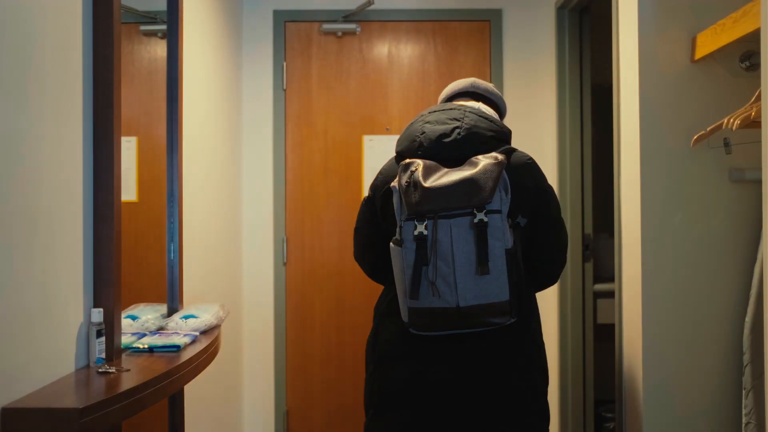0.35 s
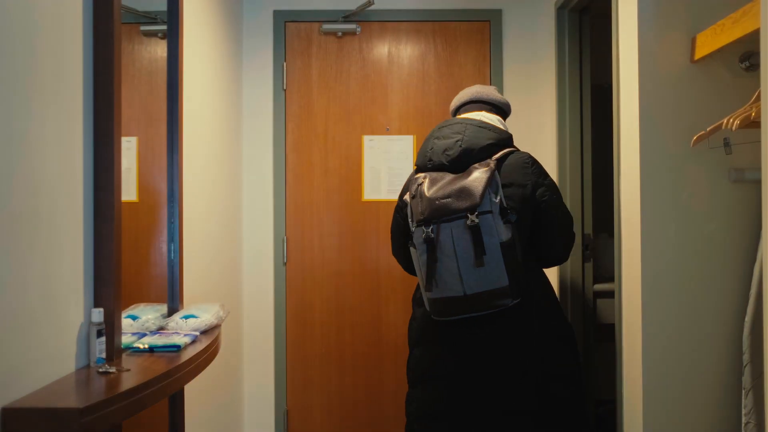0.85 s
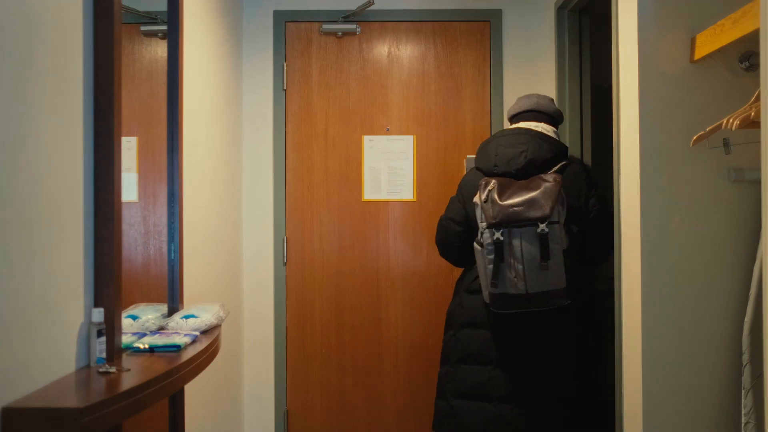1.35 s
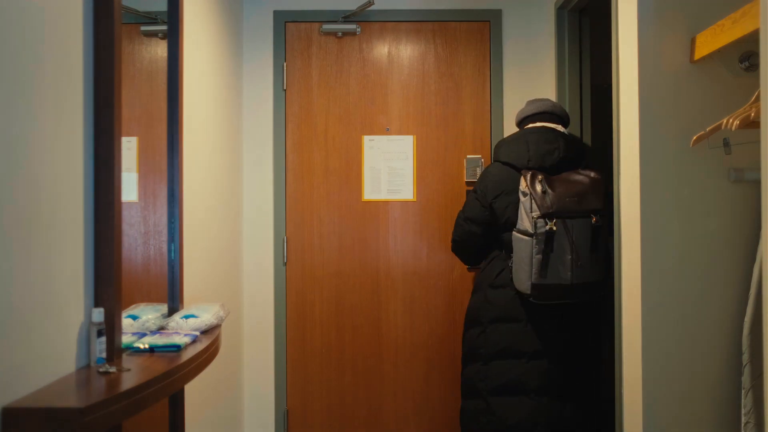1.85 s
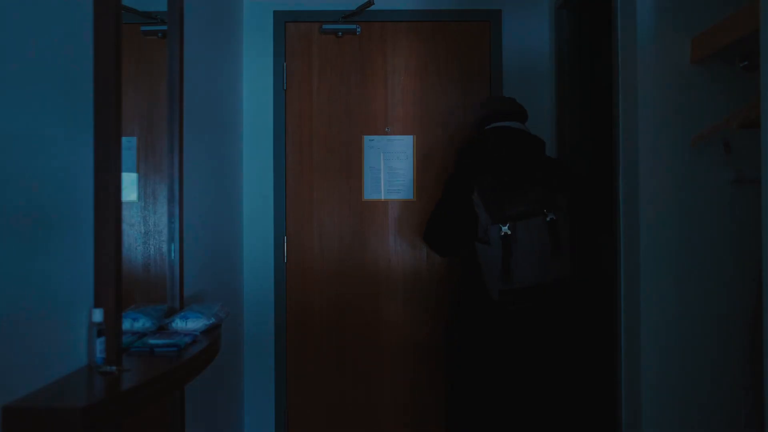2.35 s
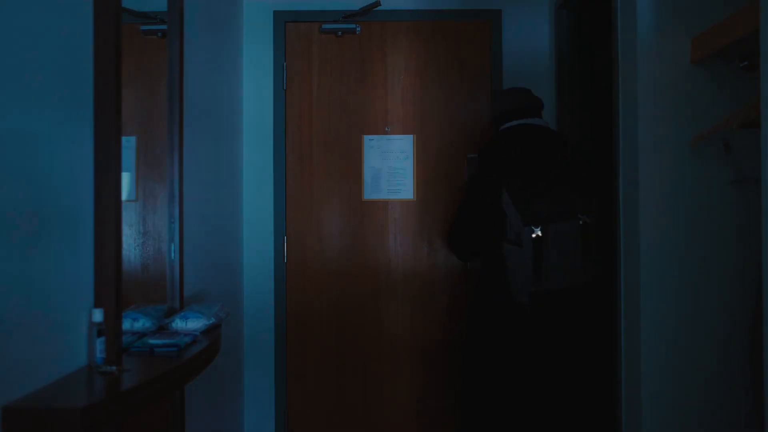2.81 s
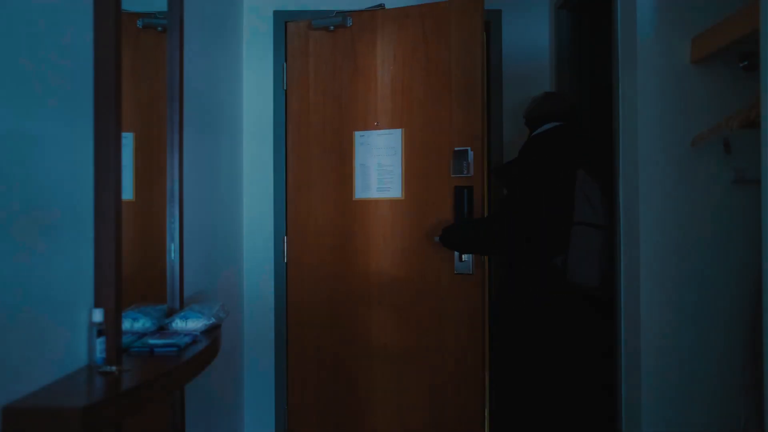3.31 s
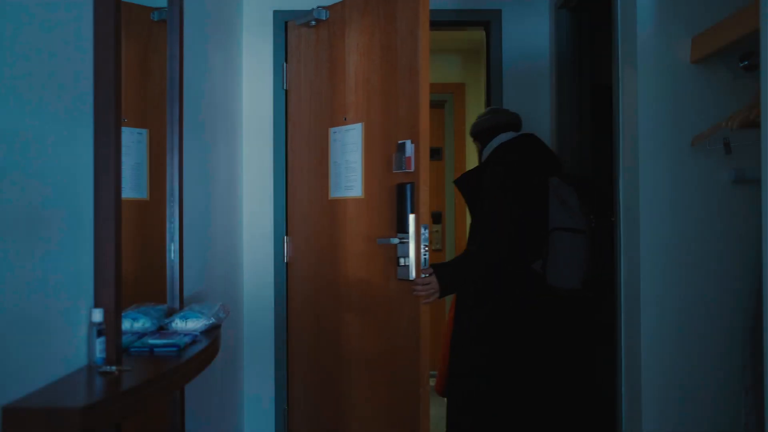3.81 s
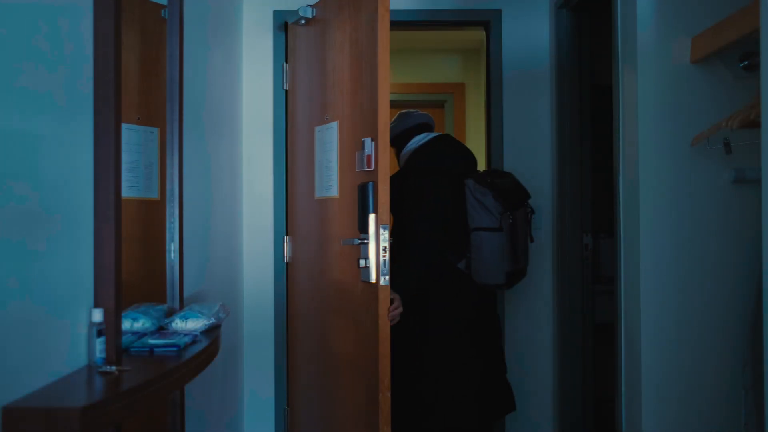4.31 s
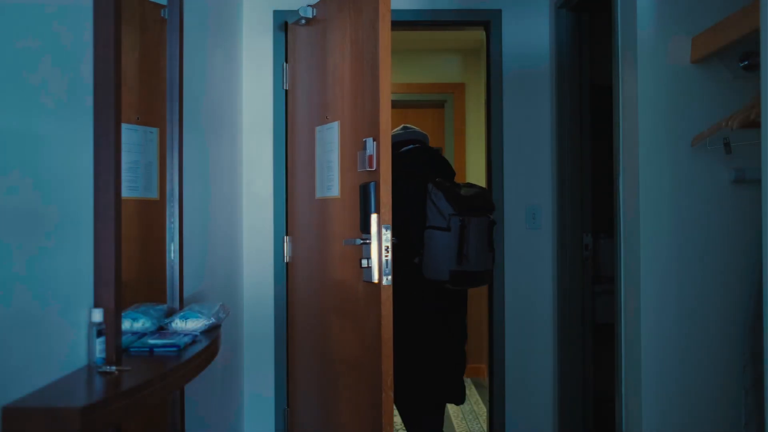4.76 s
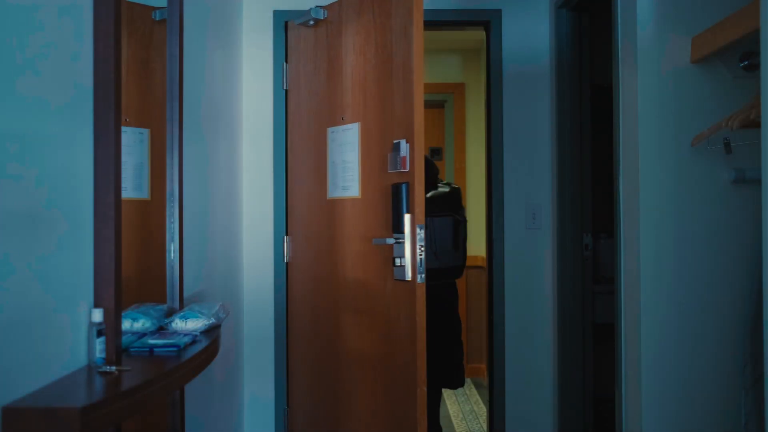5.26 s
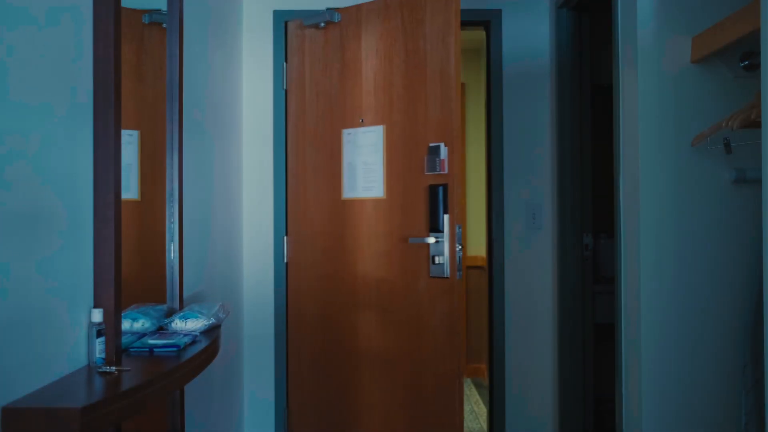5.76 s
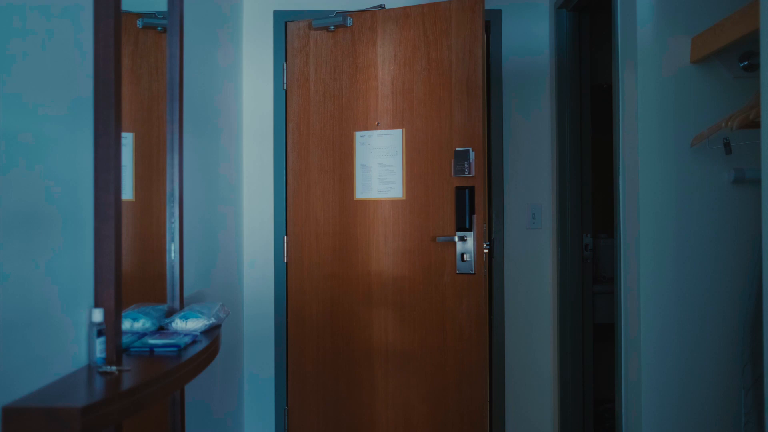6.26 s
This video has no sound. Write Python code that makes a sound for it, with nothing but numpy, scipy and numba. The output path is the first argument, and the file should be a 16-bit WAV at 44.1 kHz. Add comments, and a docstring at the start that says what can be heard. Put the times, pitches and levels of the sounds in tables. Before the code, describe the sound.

Someone in a bulky coat walks a few steps on a hollow-sounding floor, fabric swishing close to the microphone. Cloth drags sharply and a strap squeaks, the door handle snaps, and soft rustling continues with an isolated tap. Then the latch clatters in quick metallic ticks, followed by a strong dull knock and a last small click. Indoor, dry, very little echo, knocks and metal mostly on the right.

```python
"""Small dry hallway: someone in a padded coat and backpack walks and works a door handle.
Nylon rubs and scuffs close by: banded fibre noise under swelling and dying envelopes.
Heels and toes tap to the right: damped knocks with a ringing board. Handle and latch click: noise and modes.
Weight settles in soft low thuds, and strap or fabric squeaks: both are narrow bands of noise."""
import sys
import numpy as np
from scipy import signal
from scipy.fft import rfft, irfft, next_fast_len
from scipy.io import wavfile
from scipy.ndimage import uniform_filter1d
from numba import njit

SR = 44100
rng = np.random.default_rng(int(sys.argv[2]) if len(sys.argv) > 2 else 0)


def store_pcm(level_fs):
    """Save levels as 16-bit WAV."""
    pcm = np.round(np.clip(level_fs, -1, 1) * 32767).astype(np.int16)
    wavfile.write(sys.argv[1], SR, np.atleast_2d(pcm).T)


def voltage_ratio(level):
    """Linear amplitude factor for a level in decibels (scalar or array-like)."""
    return 10 ** (np.asarray(level, float) / 20)


N = 281358
T = np.arange(N) / SR


def on_hz(table, size):
    """A (Hz, value) table read at every FFT bin on a log axis."""
    hz, value = np.transpose(table)
    return np.interp(np.log(np.fft.rfftfreq(size, 1 / SR) + 1), np.log(hz), value)


def band(x, lo_hz, hi_hz):
    """Steep band-pass, rms 1."""
    sos = signal.butter(3, [lo_hz, min(hi_hz, 0.45 * SR)], "band", fs=SR, output="sos")
    y = signal.sosfilt(sos, x)
    return y / np.sqrt(np.mean(y ** 2))


def walk(rate_hz):
    """Random levels, rate_hz per second, joined by straight slopes."""
    hold = int(SR / rate_hz)
    steps = np.repeat(rng.standard_normal(N // hold + 1), hold)
    return 0.87 * uniform_filter1d(steps, hold)[:N]


def add(out, start_s, sound):
    """Mix a stereo sound in at start_s."""
    i = int(start_s * SR)
    out[:, i:i + sound.shape[1]] += sound[:, :N - i]


# Colour of sound past the clothing. Each row: frequency in Hz, gain in dB.
CLOTH_GAIN = [(30, -40), (60, -2.5), (180, 7.5), (285, -2.5), (465, 6.5), (620, -4), (1000, 1), (2150, -4),
              (2700, -23), (3150, -14), (5200, -16.5), (6250, -33), (7000, -24), (10000, -25),
              (14100, -37.5), (15500, -45)]
# Left-right likeness of the fibre noise. Each row: frequency in Hz, likeness 0-1.
EAR_LIKENESS = [(130, 1), (1400, 0.65), (3100, 0.69), (6800, 0.15), (15000, 0)]


def fibres(grit_db):
    """Threads slip over threads: noise with uneven grains, alike left and right in the bass only."""
    size = next_fast_len(N)
    grains = rng.standard_normal((2, N)) * voltage_ratio(grit_db * walk(640))
    mid, side = rfft(grains, size)
    like = np.sqrt(np.clip(on_hz(EAR_LIKENESS, size), 0, 1))
    mid, side = mid * np.sqrt(1 + like), side * np.sqrt(1 - like)
    stereo = np.array([mid + side, mid - side])
    return irfft(voltage_ratio(on_hz(CLOTH_GAIN, size)) * stereo, size)[:, :N]


def patchy(x, patchy_db):
    """Small folds ring and fall silent at random: short, narrow patches of the sound swell or dip."""
    frames = signal.stft(x, nperseg=384)[2]
    chance = uniform_filter1d(rng.standard_normal(frames.shape[1:]), size=4) * 2  # same in both ears
    return signal.istft(frames * voltage_ratio(patchy_db * chance), nperseg=384)[1][:, :N]


@njit
def resonance(x, centre_hz, width_hz):
    """State-variable band-pass whose centre moves sample by sample, gain 1 at the centre."""
    y, band_state, low_state = np.empty(len(x)), 0., 0.
    for i in range(len(x)):
        g, k = np.tan(np.pi * centre_hz[i] / SR), width_hz / centre_hz[i]
        v = (band_state + g * (x[i] - low_state)) / (1 + g * (g + k))
        band_state = 2 * v - band_state
        low_state = low_state + 2 * g * v
        y[i] = k * v
    return y


# Quiet nylon rubbing between movements. Each row: time in seconds, level in dB.
RUBBING = [(0.0, -65.5), (2.54, -55.5), (2.66, -62), (4.01, -59), (4.23, -60), (4.9, -58), (5.78, -69),
           (6.06, -67.5), (6.38, -62.5)]
RUB_BODY_DB, RUB_HISS_DB, RUB_AIR_DB = -3.5, -4.5, -14  # re rubbing level
# Limb swings: cloth swells, stops short.
# Each row: stop in seconds, swell in seconds, level in dB, brightness in dB, fold resonance in Hz.
LIMB_SWINGS = [(0.029, 0.33, -58, -3.5, 1370), (0.401, 0.44, -47.5, -2.5, 1800),
               (0.611, 0.12, -53.5, -11.5, 1190), (1.026, 0.43, -54, -1, 1486),
               (1.25, 0.18, -50.5, -8, 1210), (1.762, 0.19, -57, 5, 1760), (1.995, 0.28, -58.5, 0, 1600),
               (2.41, 0.42, -70, 7, 1240), (2.444, 0.051, -36.5, -13, 1620),
               (3.445, 0.094, -60, 10.5, 1480), (3.69, 0.54, -64.5, 0, 1396), (4.2, 0.2, -60.5, -13, 1010),
               (4.3, 0.21, -62, 5.5, 1500), (4.618, 0.36, -50, 0.5, 1520), (4.81, 0.19, -60.5, -6, 1420),
               (5.03, 0.11, -55.5, -2, 1455), (5.195, 0.072, -63.5, 3.5, 1886), (5.4, 0.13, -63, -6, 1800),
               (6.201, 0.28, -61.5, 0.5, 1520)]
SWING_T60_S, SWING_BODY_DB, SWELL_POWER = 0.18, -10, 5.83
# Sudden drags of cloth.
# Each row: start in seconds, level in dB, 60 dB fall in seconds, brightness in dB, body in dB.
CLOTH_DRAGS = [(0.992, -46, 0.14, -28, 3.5), (1.249, -39, 0.37, -10.5, -3), (1.276, -38, 0.071, -6.5, -0.5),
               (1.964, -44.5, 0.22, -13.5, -4.5), (2.045, -40, 0.061, -19, -49),
               (2.103, -49.5, 0.026, -12, -34), (2.436, -29.5, 0.2, -7, -11.5),
               (2.4774, -31.5, 0.11, -3.5, -12), (2.494, -29.5, 0.22, -15, -6.5),
               (2.881, -53.5, 0.19, -8.5, -7.5), (2.996, -45.5, 0.32, -3, -21),
               (3.05, -32.5, 0.036, 2, -40), (3.063, -30, 0.15, -3.5, -40), (3.375, -57.5, 0.34, -6, -7.5),
               (5.571, -45.5, 0.092, -10.5, -11), (6.273, -53, 0.06, -5, -30)]
DRAG_RISE_S, DRAG_HOLD, DRAG_GRIT_DB = 0.0048, 0.2, 1  # hold: share of the fall time
SWING_AIR_DB, DRAG_AIR_DB = (-9, -29), (-12, -24)  # air and top layers
HISS_POWER, AIR_POWER = 1.07, 1.26  # envelope powers: treble rises later, dies sooner


def swing_shape(stop_s, swell_s):
    """Envelope of a limb swing: slow swell, then exponential fall from the stop."""
    swell = np.sin(np.pi / 2 * np.clip(1 + (T - stop_s) / swell_s, 0, 1)) ** SWELL_POWER
    return voltage_ratio(-60 * np.clip(T - stop_s, 0, 1) / SWING_T60_S) * swell


def drag_shape(start_s, fall_s):
    """Envelope of a drag: quick rise, short hold, exponential fall."""
    rise = np.clip((T - start_s) / DRAG_RISE_S, 0, 1) ** 2
    return voltage_ratio(-60 * np.clip((T - start_s - DRAG_RISE_S) / fall_s - DRAG_HOLD, 0, 9)) * rise


def coat():
    """Rubbing, swings and drags each set body, middle, hiss, air and top of one fibre noise; rubbing has no top."""
    middle = voltage_ratio(np.interp(T, *np.transpose(RUBBING)))
    body, hiss, air = middle * voltage_ratio(RUB_BODY_DB), middle * voltage_ratio(RUB_HISS_DB), middle * voltage_ratio(RUB_AIR_DB)
    top = 0
    grit = voltage_ratio(DRAG_GRIT_DB * walk(250))  # a hard drag catches unevenly
    moves = [(db, swing_shape(stop, swell), bright_db, SWING_BODY_DB, SWING_AIR_DB)
             for stop, swell, db, bright_db, _ in LIMB_SWINGS]
    moves += [(db, grit * drag_shape(start, fall), bright_db, body_db, DRAG_AIR_DB)
              for start, db, fall, bright_db, body_db in CLOTH_DRAGS]
    for db, shape, bright_db, body_db, (air_db, top_db) in moves:
        body = body + shape * voltage_ratio(db + body_db)
        middle = middle + shape * voltage_ratio(db)
        hiss = hiss + shape ** HISS_POWER * voltage_ratio(db + bright_db)
        # brightness weighs most at the very top
        air = air + shape ** AIR_POWER * voltage_ratio(db + 1.34 * bright_db + air_db)
        top = top + shape ** AIR_POWER * voltage_ratio(db + 2.3 * bright_db + top_db)
    noise = patchy(fibres(grit_db=0.56), patchy_db=3.5)
    # air pocket in the folds lifts one pitch, wandering from swing to swing
    fold_hz = np.interp(T, *np.transpose([(row[0], row[-1]) for row in LIMB_SWINGS]))
    noise = noise + 0.37 * np.array([resonance(ear, fold_hz, 490.0) for ear in noise])
    layers = [(body, 25, 640), (middle, 640, 2700), (hiss, 2700, 6300),
              (air, 6300, 17000), (top, 10500, 17000)]
    rustle = sum(gain * voltage_ratio(0.87 * walk(40)) * band(noise, lo_hz, hi_hz) for gain, lo_hz, hi_hz in layers)
    return rustle * voltage_ratio([[-0.8], [0.8]])


# Heel and toe taps. Each row: start in seconds, knock in dB, board ring in dB, ring decay in seconds.
FOOT_TAPS = [(.028, -13, -21, 0.0066), (0.068, -24.5, -35.5, 0.017), (0.409, -23, -32, 0.0092),
             (0.43, -44, -31.5, 0.0083), (0.445, -21.5, -38, 0.019), (.6127, -28, -30.5, 0.0042),
             (0.653, -27, -39, 0.022), (1.035, -14.5, -23, 0.0045), (1.07, -28, -35.5, 0.0077),
             (1.09, -35, -40, 0.0083), (1.411, -18, -31, 0.011), (1.443, -24.5, -33.5, 0.017),
             (3.635, -58, -37, 0.022), (3.664, -30, -43.5, 0.071), (3.698, -14.5, -25, 0.01),
             (4.6235, -17, -19.5, 0.0052), (5.453, -13, -26.5, 0.043), (5.611, -20.5, -31, 0.023),
             (5.8258, -9, -19, 0.0068), (5.845, -42, -40, 0.038), (5.908, -39, -40.5, 0.0096)]
KNOCK_HZ, BOARD_HZ = 394, 176.8


def taps():
    """A short hollow knock, mostly on the right, then the board rings on with a rattle at its octave."""
    out, t = np.zeros((2, N)), np.arange(int(0.15 * SR)) / SR
    swell = t / 0.0016 * np.exp(1 - t / 0.0013)
    ring_rise = np.sin(np.pi / 2 * np.clip(t / 0.0037, 0, 1)) ** 2
    for start, knock_db, ring_db, decay_s in FOOT_TAPS:
        # uneven rattle: phase drifts, each swing has its own size
        wobble = uniform_filter1d(np.cumsum(rng.standard_normal(len(t))), size=90) * 0.055
        loose = voltage_ratio(0.63 * np.interp(t, np.arange(30) * 0.0075, rng.standard_normal(30)))
        turn = 2 * np.pi * BOARD_HZ * (t - 0.002) + wobble
        ring = loose * voltage_ratio(ring_db) * np.exp(-(t / decay_s) ** 1.6) * ring_rise
        knock_hz = KNOCK_HZ * (1 + 0.012 * rng.standard_normal())
        hit = -voltage_ratio(knock_db) * swell * np.sin(2 * np.pi * knock_hz * t)
        left = 0.044 * hit + ring * (np.cos(turn) + 0.29 * np.cos(2 * turn))
        right = hit + ring * (1.09 * np.cos(turn) + 1.26 * np.cos(2 * turn))
        add(out, start, np.array([left, right]))
    # the taps carry no deep bass, below 50 Hz
    return signal.sosfilt(signal.butter(2, 50, "high", fs=SR, output="sos"), out)


# Handle, latch and buckle clicks.
# Each row: start in seconds, level in dB, main ring in Hz, crack in dB, build-up in seconds.
METAL_CLICKS = [(0.0256, -43, 1380, -3, .0004), (1.9965, -27, 1800, -6, .002),
                (2.003, -33, 4300, -6, .0015), (2.0495, -31.5, 2330, -21, .0015),
                (2.997, -32, 4000, -20, .0015), (3.4508, -21.5, 4130, -1.5, .0012),
                (5.0368, -23.5, 1720, -6, 0.0015), (5.0492, -33, 4550, -20, .0015),
                (5.056, -35.5, 1250, -8, .0015), (5.1979, -21, 2430, -5.5, 0.001),
                (5.2047, -39, 1210, -19, .001), (5.408, -22, 4260, -3.5, .0004),
                (5.4147, -30, 3420, -5, .0035), (5.432, -29.5, 1850, -8, .002),
                (5.4418, -27, 3530, -5, .003), (5.45, -23.5, 4450, -4.5, .0012),
                (5.551, -46, 3640, -4, .001), (5.5595, -38, 1230, -14, .002),
                (5.581, -29, 4510, -5.5, .0025), (5.588, -35, 4340, -12, .002),
                (5.6018, -14.5, 4486, -5, .003), (6.251, -28.5, 1710, -24, .002),
                (6.2575, -27, 1980, -4, .0028), (6.28, -33, 2000, -10, .0004)]
# Latch modes. Each row: frequency in Hz, level in dB, longest T60 in seconds.
LATCH_MODES = [(1176, -8, 0.14), (1800, 1.5, 0.077), (2412, 1.5, 0.046), (3388, -2, 0.035),
               (4095, -3, 0.036), (4670, 9.5, 0.0059), (5260, -4.5, 0.038), (7500, -24, 5.0)]
BASE_T60_S, BASE_LEVEL_DB, SHORTENING_PER_DB = 0.012, -18.5, 0.023  # harder clicks die faster
FADE_POWER, NEAR_DB_PER_OCTAVE = 0.92, 8
RIGHT_LATE_S = 0.000269  # sharp edge reaches the right later


def clicks():
    """Metal meets metal, louder on the right: noise crack, struck part and the latch modes nearest to it."""
    out, t = np.zeros((2, N)), np.arange(4096) / SR
    mode_hz, mode_db, mode_t60 = np.transpose(LATCH_MODES)[:, :, None]
    for start, level_db, ring_hz, crack_db, rise_s in METAL_CLICKS:
        # the parts scrape, then meet
        after = np.clip(t - rise_s, 0, 1)
        grow = np.clip(t / max(rise_s, 1 / SR), 0, 1) ** 2.9
        base_s = BASE_T60_S * np.exp(-SHORTENING_PER_DB * (level_db - BASE_LEVEL_DB))

        near = voltage_ratio(mode_db - NEAR_DB_PER_OCTAVE * np.abs(np.log2(mode_hz / ring_hz)))
        phase = rng.uniform(0, 2 * np.pi, mode_hz.shape)
        mode_fade = voltage_ratio(-60 * (after / np.minimum(mode_t60, 1.4 * base_s)) ** FADE_POWER)
        modes = np.sum(near * mode_fade * np.sin(2 * np.pi * mode_hz * t + phase), axis=0)
        part_fade = voltage_ratio(-60 * (after / (1.16 * base_s)) ** FADE_POWER)
        part = part_fade * np.sin(2 * np.pi * ring_hz * t)

        hiss = irfft(rfft(rng.standard_normal((2, len(t)))) * voltage_ratio(on_hz(CLOTH_GAIN, len(t))), len(t))
        crack_fade = voltage_ratio(-60 * (after / (1.3 * base_s)) ** FADE_POWER)
        wall_tail = voltage_ratio(-19.0 - 60 * t / 0.071)  # nearby walls
        crack = band(hiss[0] + 0.27 * hiss, 1690, 6660) * (crack_fade + wall_tail)
        # only a hard crack reaches the very top
        tick = band(band(hiss, 4400, 11000), 4400, 11000) * voltage_ratio(-60 * after / 0.0065)

        click = 1.53 * modes / np.abs(modes).max() + voltage_ratio(crack_db) * crack + voltage_ratio(4.96 * crack_db + 5) * tick
        click = click * grow
        click[1] = np.interp(t - RIGHT_LATE_S, t, click[1], left=0)
        click = click + 0.41 * part * grow  # main ring fills the hallway: no delay between ears
        add(out, start, click * voltage_ratio(level_db + np.array([[-2], [3.5]])))
    return out


# Soft thuds of body weight. Each row: start in seconds, level in dB, pitch in Hz, decay in seconds.
WEIGHT_THUDS = [(1.257, -29, 187, 0.025), (1.31, -36.5, 196, 0.02), (1.474, -40, 139, 0.039),
                (1.731, -47.5, 119, 0.069), (2.007, -42, 202, 0.043), (2.172, -45.5, 149, 0.077),
                (2.487, -33, 197, 0.049), (3.385, -54.5, 162, 0.061), (4.15, -53, 193, 0.039),
                (4.795, -51, 131, 0.041), (4.912, -54, 180, 0.085)]


def thuds():
    """Weight rolls onto the floor: a short rumble around one low pitch, the same in both ears."""
    out, t = np.zeros((2, N)), np.arange(int(0.3 * SR)) / SR
    for start, db, hz, decay_s in WEIGHT_THUDS:
        rumble = band(rng.standard_normal(2 * len(t)), 0.746 * hz, 1.335 * hz)[len(t):]
        shape = np.exp(-(t / decay_s) ** 2) * np.clip(t / 0.0025, 0, 1)
        add(out, start, np.tile(voltage_ratio(db) * rumble * shape, (2, 1)))
    return out


# Squeaks of strap or fabric. Each row: start in seconds, level in dB, pitch in Hz, decay in seconds.
STRAP_SQUEAKS = [(0.968, -47, 1570, 0.04), (1.958, -41, 497, 0.036), (2.05, -39, 976, 0.045),
                 (2.064, -44.5, 2300, 0.032), (1.279, -45.5, 4680, 0.073), (2.482, -30, 5270, 0.014),
                 (2.497, -17, 1670, 0.011), (2.895, -38.5, 2100, 0.012), (2.096, -45.5, 3280, 0.019),
                 (2.104, -50, 1530, 0.045), (4.151, -49, 954, 0.024), (4.339, -48.5, 1770, 0.051),
                 (4.534, -47, 4010, 0.078), (4.923, -45.5, 1037, 0.035), (6.312, -58, 1940, 0.03)]
SQUEAK_HALF_WIDTH, SQUEAK_RISE_S = 0.084, 0.0019  # half width: share of the pitch


def squeaks():
    """Stick-slip chatter held in one narrow resonance, made as narrow-band noise."""
    out, t = np.zeros((2, N)), np.arange(int(0.2 * SR)) / SR
    for start, db, hz, decay_s in STRAP_SQUEAKS:
        mid, side = rng.standard_normal((2, len(t)))
        stereo = mid + 0.22 * side * np.array([[1], [-1]])
        tone = band(stereo, hz * (1 - SQUEAK_HALF_WIDTH), hz * (1 + SQUEAK_HALF_WIDTH))
        shape = np.exp(-(t / decay_s) ** 1.56) * np.clip(t / SQUEAK_RISE_S, 0, 1)
        add(out, start, voltage_ratio(db) * tone * shape)
    return out


def scene():
    """Coat, feet, door hardware and squeaks together."""
    return coat() + taps() + clicks() + thuds() + squeaks()


def top_cut(x):
    """Nothing passes above the cut-off."""
    return signal.sosfilt(signal.butter(12, 15670, fs=SR, output="sos"), x)


def record(dry):
    """The microphone sheds the deepest bass, below 60 Hz."""
    mix = signal.sosfilt(signal.butter(2, 60, "high", fs=SR, output="sos"), dry)
    return top_cut(mix)


dry = scene()
out = record(dry)
store_pcm(out)
```